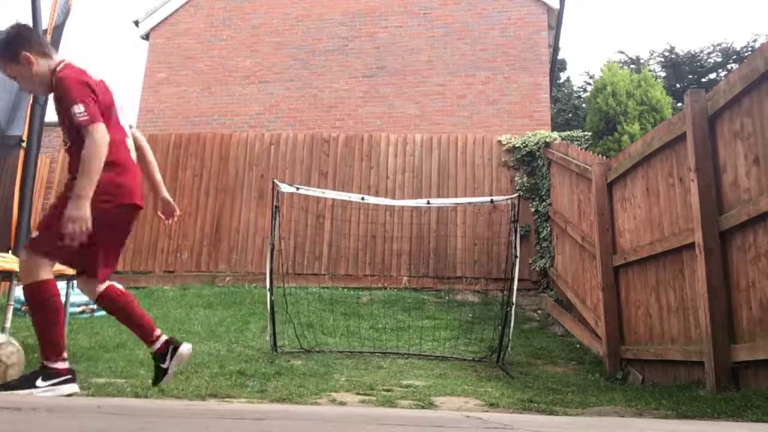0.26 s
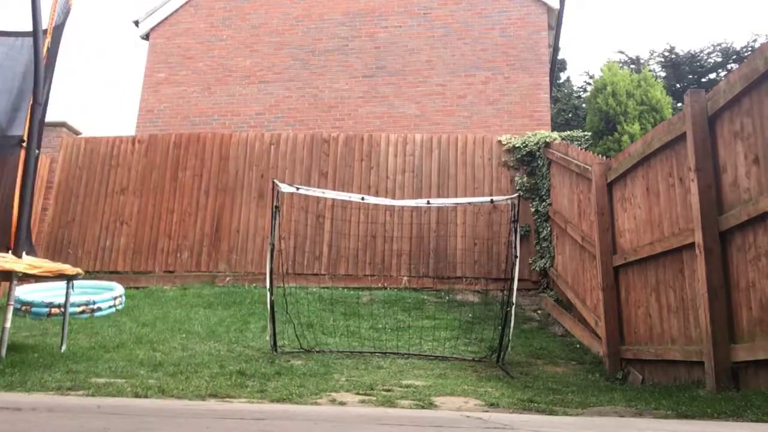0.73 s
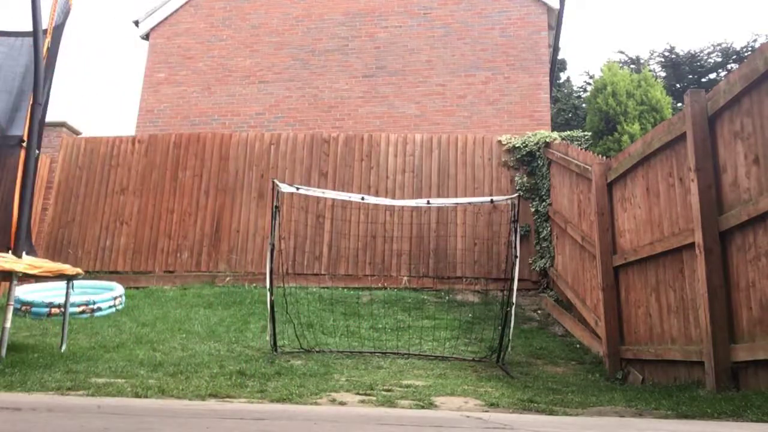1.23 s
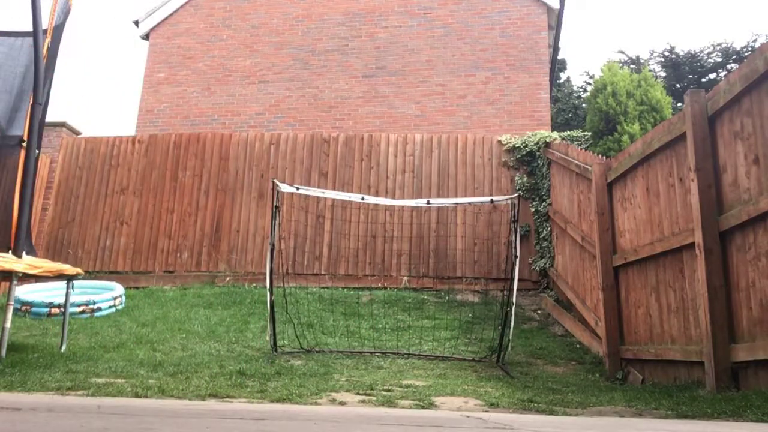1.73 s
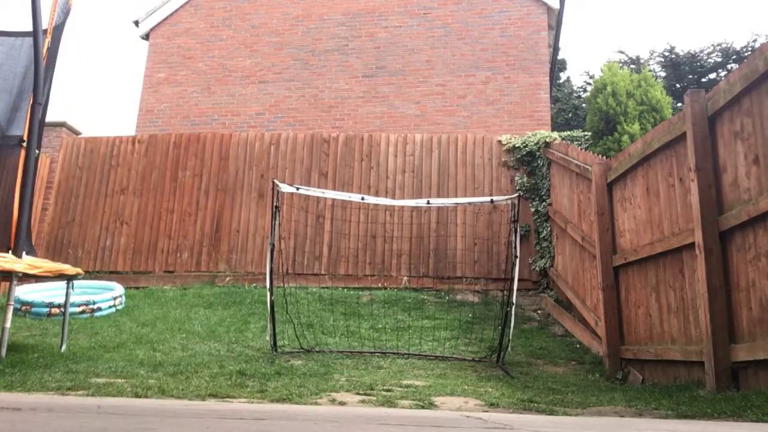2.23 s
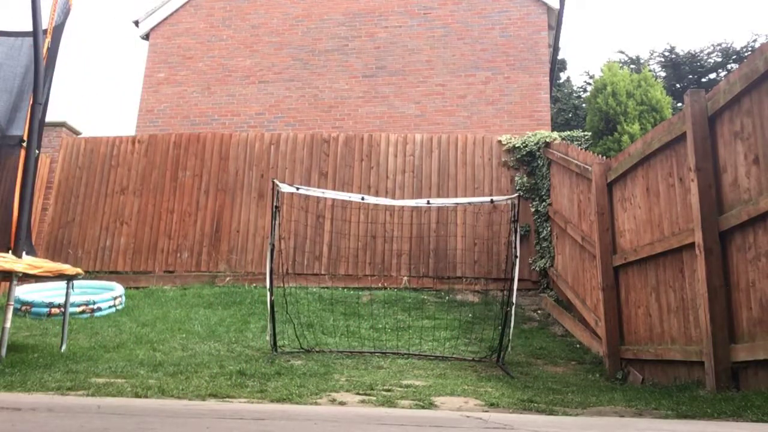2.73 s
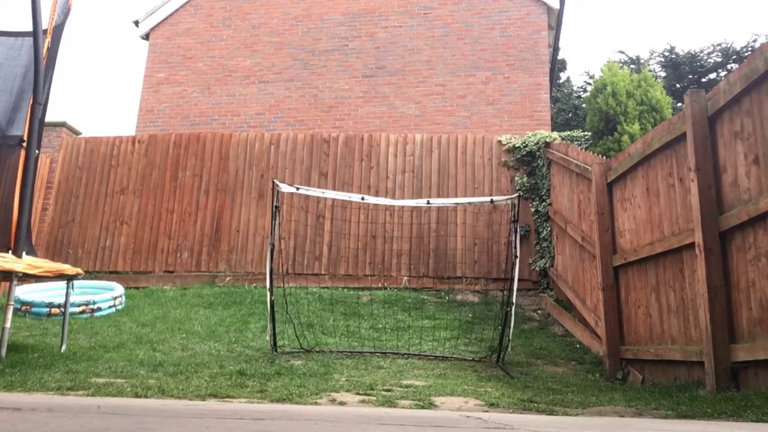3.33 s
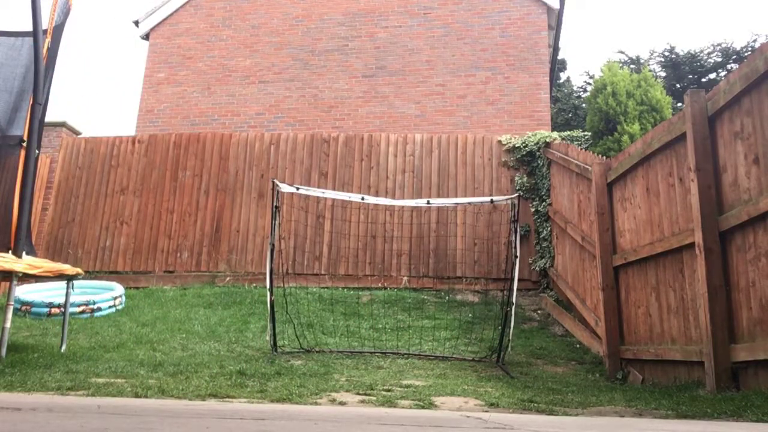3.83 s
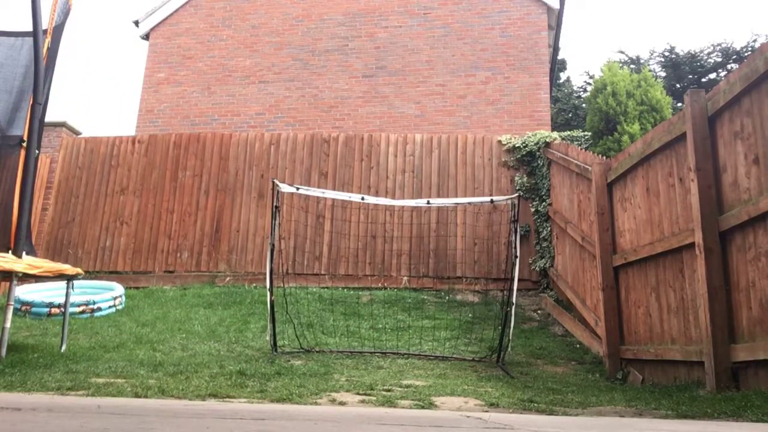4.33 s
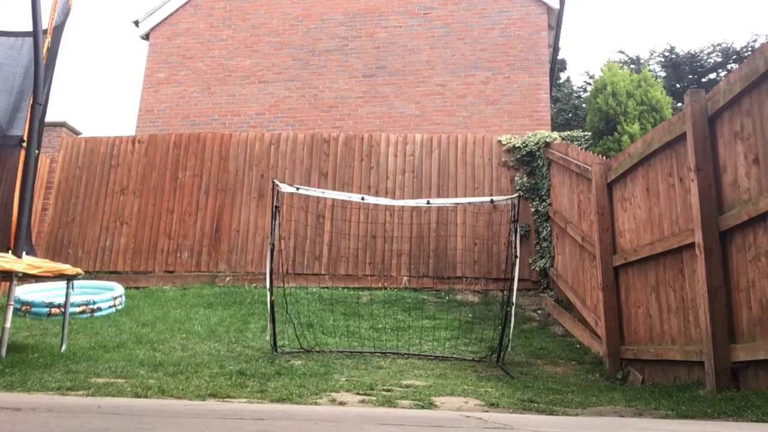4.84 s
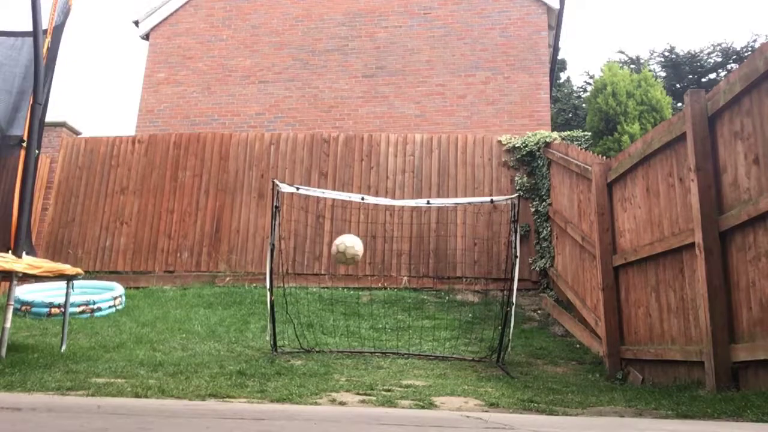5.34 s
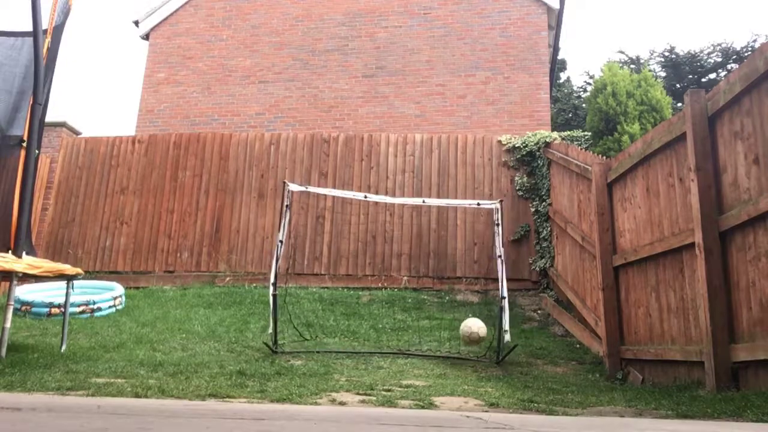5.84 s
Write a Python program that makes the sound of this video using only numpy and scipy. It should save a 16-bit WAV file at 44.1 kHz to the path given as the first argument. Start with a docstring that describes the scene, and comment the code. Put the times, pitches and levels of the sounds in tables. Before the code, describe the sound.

Dull football touches, a booming knock on a garden fence, quiet steps through grass, then one sharp kick and a soft net smack.

```python
"""Football in a small fenced garden

A child taps a ball on the lawn; it bangs against a wooden fence and bounces. Shoes thud and swish
through the grass. A hard shot smacks into the net of a light goal and the ball drops.
The fences echo the play. Far traffic hums and small birds chirp."""
import sys
import numpy as np
from scipy import signal
from scipy.fft import rfft, irfft
from scipy.io import wavfile
from scipy.ndimage import uniform_filter1d

SR = 44100
rng = np.random.default_rng(int(sys.argv[2]) if len(sys.argv) > 2 else 0)


def materialize(psi):
    """Save the field psi as 16-bit PCM at rate SR to the path in sys.argv[1].

    A 1-D psi becomes a single channel; in a 2-D psi each row is a channel.
    """
    bounded = np.clip(np.atleast_2d(psi).T, -1, 1)
    quanta = np.round(bounded * 32767).astype(np.int16)
    wavfile.write(sys.argv[1], SR, quanta)


N = 267772
T = np.arange(int(.8 * SR)) / SR   # time axis of one event, s

# Spectrum of a board knock or sole pat. Each row: frequency in Hz, level in dB.
CLATTER_SPECTRUM = [(150, 3), (400, 13), (1200, 3), (1800, -13.5), (3000, -16), (5000, -25), (9000, -30.5),
                    (15000, -69)]


def from_db(db):
    """Decibels to gain."""
    return 10 ** (np.asarray(db) / 20)


def unit_rms(x):
    """Scale to unit power."""
    return x / np.sqrt(np.mean(x ** 2) + 1e-20)


def add(out, start_s, sound):
    """Mix a sound in at start_s."""
    i = max(0, int(start_s * SR))
    out[i:i + len(sound)] += sound[:max(0, N - i)]


def band_noise(low_hz, high_hz, size=len(T)):
    """Band-passed white noise."""
    sos = signal.butter(2, [low_hz, min(high_hz, .45 * SR)], "band", fs=SR, output="sos")
    return signal.sosfilt(sos, rng.standard_normal(size))


def shaped_noise(spectrum, size=len(T), tilt_db_oct=0):
    """Unit-power noise with a tilted spectrum of (Hz, dB) rows."""
    octaves = np.log2(np.fft.rfftfreq(size, 1 / SR) + 1)
    hz, db = np.transpose(spectrum)
    gain = from_db(np.interp(octaves, np.log2(hz), db) + tilt_db_oct * octaves)
    return unit_rms(irfft(rfft(rng.standard_normal(size)) * gain, size))


def ring(modes):
    """Struck modes; their strengths vary slightly per blow."""
    return sum((-1) ** k * from_db(db + rng.normal() - 60 * T / t60_s) * np.sin(2 * np.pi * hz * T)
               for k, (hz, db, t60_s) in enumerate(modes))


def thump(hz, swell_s):
    """A few cycles that swell under compression and die on release."""
    u = T / swell_s
    return (u * np.exp(1 - u)) ** 2 * np.sin(2 * np.pi * hz * T)


def slap(hz, cycles):
    """Pressure swing of air squeezed from a contact; soft surfaces round its edge."""
    soften = signal.butter(2, min(3 * hz, .4 * SR), fs=SR, output="sos")
    return -signal.sosfilt(soften, thump(hz, cycles / hz))


def stroke(length_s):
    """Rise and fall times of a rub; quick ones start abruptly."""
    slow_s = 0.048
    rise_share = max(0.35 * min(length_s / slow_s, 1), .01)
    return rise_share * length_s, (1 - rise_share) * length_s


def swell(rise_s, fall_s):
    """Linear rise, exponential fall."""
    return np.minimum(T / rise_s, 1) * np.exp(-np.maximum(T - rise_s, 0) / fall_s)


def rustle(spectrum, rise_s, fall_s, grain_db, tilt_db_oct=0):
    """Many small contacts: noise in millisecond grains that swells and fades."""
    lumps = uniform_filter1d(uniform_filter1d(rng.standard_normal(len(T)), size=50), size=12)
    grains = unit_rms(from_db(grain_db * unit_rms(lumps)))
    return shaped_noise(spectrum, tilt_db_oct=tilt_db_oct) * grains * swell(rise_s, fall_s)


def traffic(level_db):
    """Steady hum of far traffic."""
    # Each row: frequency in Hz, relative density in dB.
    hum_spectrum = [(13, 5), (22, -26), (49, 3), (80, -4.5), (199, -6), (536, -15.5), (904, -11.5),
                    (1440, -22.5), (1660, -27), (2120, -35), (2570, -35), (4580, -41.5), (5560, -42.5),
                    (12300, -47), (15800, -60)]
    return from_db(level_db) * shaped_noise(hum_spectrum, N)


def bird_note(level_db, end_s):
    """A far bird holds a thin high note."""
    fade = np.clip((end_s - np.arange(N) / SR) / .1, 0, 1)
    return from_db(level_db) * unit_rms(band_noise(5200, 5660, N)) * fade


def bird_chips(start_s, end_s, level_db, tones_hz, count):
    """Another far bird repeats two-toned chips at a loose pace."""
    out = np.zeros(N)
    envelope = np.sin(np.pi * np.minimum(T / .05, 1)) ** 2
    for s, (late, stray_db) in zip(np.linspace(start_s, end_s, count), rng.standard_normal((count, 2))):
        low, high = (unit_rms(band_noise(hz / 1.04, hz * 1.04)) for hz in tones_hz)
        add(out, s + .012 * late, from_db(level_db + stray_db) * (low + from_db(-2) * high) * envelope)
    return out


def garden(play, build_s):
    """Direct sound, dull echoes off fences and walls, then diffuse scatter."""
    # Each row: delay in seconds, level in dB.
    echoes = [(.0018, -39), (0.011, -9.5), (0.0154, -45), (0.0199, -16), (.0225, -36), (0.038, -38)]
    # Each row: frequency in Hz, level in dB, T60 in seconds.
    scatter_bands = [(50, -18, 0.83), (124, -5, 0.54), (263, -1.5, 0.34), (573, -10, 0.37),
                     (1140, -12, 0.39), (2930, -8.5, 0.22), (6700, -19.5, 0.56), (14000, -19, 0.34)]
    # Reflections grow as the play moves away. Each row: time in seconds, send in dB.
    reverb_send = [(0.5, -4.5), (0.92, 0), (1.8, 1.5), (5.14, -3), (5.6, -0.5)]
    response = np.zeros(len(T))
    for delay_s, echo_db in echoes:
        response[int(delay_s * SR)] += from_db(echo_db)
    response = signal.sosfilt(signal.butter(1, [220, 1900], "band", fs=SR, output="sos"), response)
    hz, *columns = np.transpose(scatter_bands)
    for centre_hz in 40 * 2 ** np.arange(0, 9, .5):
        db, t60_s = (np.interp(np.log(centre_hz), np.log(hz), column) for column in columns)
        fade = (1 - np.exp(-(T / build_s) ** 2)) * from_db(-60 * T / t60_s)
        scatter = band_noise(centre_hz / 2 ** .25, centre_hz * 2 ** .25)
        response += from_db(db) * scatter * fade / np.linalg.norm(fade)
    send = from_db(np.interp(np.arange(N) / SR, *np.transpose(reverb_send)))
    return play + signal.fftconvolve(play * send, response)[:N]


def ticks(centre_hz, decay_s):
    """The ball clips something hard."""
    # Each row: start in seconds, level in dB.
    contacts = [(0.5098, -42.5), (1.3588, -42.5), (5.8732, -41.5)]
    out = np.zeros(N)
    for s, db in contacts:
        burst = unit_rms(band_noise(centre_hz / 1.4, centre_hz * 1.4))
        add(out, s, from_db(db) * burst * np.exp(-T / decay_s))
    return out


def footsteps(base_hz, firmness_oct_per_db):
    """Heels thud and soles pat on turf; a firmer step thuds higher."""
    # Each row: start in seconds, heel level in dB, sole level in dB.
    steps = [(0.258, -38.5, -41), (0.632, -48, -34.5), (0.711, -55, -32), (0.863, -62, -32),
             (2.275, -33, -53), (2.455, -33.5, -42), (4.55, -48, -45.5), (4.96, -37.5, -38.5),
             (5.001, -40, -40)]
    out = np.zeros(N)
    for s, heel_db, pat_db in steps:
        heel_hz = base_hz * 2 ** (firmness_oct_per_db * (pat_db - heel_db))
        add(out, s, from_db(heel_db) * thump(heel_hz, swell_s=0.0052))
        add(out, s, from_db(pat_db) * rustle(CLATTER_SPECTRUM, rise_s=0.0036, fall_s=0.014, grain_db=0.5))
    return out


def grass():
    """Shoes and ball brush the blades; slow strokes also drag the sole and crunch."""
    # Each row: start in seconds, length in seconds, level in dB, tilt in dB per octave.
    swishes = [(0.255, 0.036, -51.5, -2), (0.696, .035, -37, -0.5), (0.851, 0.032, -37.5, -1.5),
               (1.3023, 0.012, -32, -1), (1.40, 0.25, -64.5, 0.5), (1.981, 0.065, -44.5, -2.5),
               (2.019, 0.024, -46, -1), (2.121, 0.04, -45.5, -1.5), (2.175, 0.013, -52, 2.5),
               (2.791, 0.11, -50, -4), (3.253, 0.049, -57.5, -2), (3.54, .05, -47, -3),
               (4.017, .018, -50.5, 1), (4.1275, 0.015, -40.5, 0.5), (4.829, .088, -48.5, -4.5),
               (5.1213, 0.0099, -30, -3.5), (5.141, 0.0084, -32, -2), (5.307, 0.038, -46.5, -3),
               (5.395, 0.075, -53, -2.5), (5.459, 0.0076, -42, -3)]
    # Each row of both: frequency in Hz, level in dB.
    blade_spectrum = [(150, -5), (500, 16), (1200, 17), (1800, -1), (3000, 5), (4200, 6), (5200, 3),
                      (7500, 3.5), (9500, 5), (12000, -4.5), (16000, -17)]
    sole_spectrum = [(300, -14.5), (1500, -1), (2400, -3), (3100, -1.5), (4300, -5), (5500, -6),
                     (9000, -13), (16000, -50)]
    out = np.zeros(N)
    for s, length_s, db, tilt in swishes:
        rise_s, fall_s = stroke(length_s)
        blades = rustle(blade_spectrum, rise_s, fall_s, grain_db=1, tilt_db_oct=tilt)
        sole = rustle(sole_spectrum, rise_s, fall_s, grain_db=2, tilt_db_oct=tilt)
        drag = from_db(-1.5) * min(rise_s / 0.023, 1)
        add(out, s, from_db(db) * (blades + drag * sole))
    return out


def goal(squeak_start_s, squeak_hz):
    """The net snaps taut and drags over the frame; a thin high squeak follows, probably a far bird."""
    # Each row: start in seconds, length in seconds, level in dB.
    net_pulls = [(5.519, 0.014, -31.5), (5.526, 0.057, -40), (5.577, 0.17, -43), (5.685, 0.058, -41.5),
                 (5.787, 0.016, -40), (5.962, 0.057, -48)]
    # Each row: frequency in Hz, level in dB.
    net_spectrum = [(200, -2), (400, 1), (580, 8), (950, 5), (1500, -7), (2600, -11.5), (4200, -15.5),
                    (5500, -23.5), (9000, -29.5), (15000, -60)]
    out = np.zeros(N)
    smack = from_db(-30) * slap(hz=725, cycles=2.3) + from_db(-29.5) * slap(hz=3350, cycles=0.82)
    add(out, net_pulls[0][0], smack)
    for s, length_s, db in net_pulls:
        add(out, s, from_db(db) * rustle(net_spectrum, *stroke(length_s), grain_db=-0.5))
    waver = unit_rms(band_noise(16, 152))
    squeak = np.sin(2 * np.pi * np.cumsum(squeak_hz + 70 * waver) / SR) * from_db(4.5 * waver)
    add(out, squeak_start_s, from_db(-62) * squeak * swell(*stroke(length_s=0.088)))
    return out


def fence(heave_cycles):
    """The struck panel booms, its boards ring and clatter, a metal fitting jingles."""
    # The ball's blow, then loose boards knocking back. Each row: start in seconds, level in dB.
    knocks = [(0.9152, -18.5), (0.932, -26), (0.9592, -22.5), (0.994, -32), (1.025, -34)]
    # The panel moves on its posts. Each row: start in seconds, frequency in Hz, level in dB.
    heaves = [(0.912, 64.6, -11), (0.932, 98, -5.5), (0.981, 49.7, -18.5)]
    # Each row of both: frequency in Hz, level in dB, T60 in seconds.
    board_modes = [(80, -40, 0.4), (112.8, -36, 0.77), (192.7, -20.5, 0.23), (263.7, -25, 0.35),
                   (320.3, -15.5, 0.1), (428, -20, 0.13), (501.6, -30, 0.37), (585, -48, 0.21),
                   (730, -44, 0.14), (792, -46, 0.13), (1236, -21.5, 0.045), (1180, -56, 0.23),
                   (1360, -58, 0.27)]
    fitting_modes = [(6250, -5, 0.06), (8400, -7, 0.054), (8700, -10.5, 0.12), (11700, -14, 0.044)]
    out, struck_s = np.zeros(N), knocks[0][0]
    add(out, struck_s, from_db(-5.5) * slap(hz=704, cycles=0.27) + ring(board_modes))
    for s, hz, db in heaves:
        add(out, s, from_db(db) * thump(hz, swell_s=heave_cycles / hz))
    add(out, struck_s + 0.078, from_db(-27) * thump(hz=120, swell_s=0.026))   # settling boom
    for s, db in knocks:
        add(out, s, from_db(db) * rustle(CLATTER_SPECTRUM, rise_s=0.0011, fall_s=0.017, grain_db=4))
    for k, (s, _) in enumerate(knocks[1:]):
        chink = unit_rms(band_noise(8500, 9400)) * np.exp(-T / 0.0033)
        jingle = chink + from_db(-2) * ring(fitting_modes)
        add(out, s, from_db(-37.5 - 8.5 * k) * jingle)   # weaker on each knock
    return out


def ball(squeeze_cycles, squash_s, crack_s):
    """Foot or turf hits the ball: it thumps and slaps, shell and air ring, the skin cracks."""
    # Each row: start in seconds, slap in dB, slap in Hz, thump in dB, thump in Hz, crack in dB.
    hits = [(0.5063, -15, 870, -13, 87, -25), (0.6427, -13.5, 617, -30, 68.5, -45.5),
            (1.301, -22, 800, -25.5, 69.4, -44), (1.3591, -23, 476, -25.5, 62, -45.5),
            (1.7639, -21, 380, -23.5, 111, -39.5), (1.7949, -22.5, 218, -22, 64.3, -70),
            (1.836, -23, 644, -28.5, 91, -41), (5.1373, -2.5, 560, -7, 66.3, -18),
            (5.8622, -37, 710, -18.5, 67, -46), (5.8721, -18, 610, -26.5, 90.6, -47.5)]
    # Enclosed air and shell. Each row of both: frequency in Hz, level in dB, T60 in seconds.
    air_modes = [(990, 1, .025), (1170, -8, .055), (1480, -19, .035), (1850, -24, .045), (2230, -20, .045),
                 (2560, -22, .035)]
    shell_modes = [(123.6, 9.5, 0.061), (175, -15.5, 0.2), (225, 0.5, 0.12), (325.4, -3, 0.094),
                   (404.6, -17, 0.54), (489, -8.5, 0.085), (591.5, -4.5, 0.29), (657, -22, 0.51)]
    # Flattening shell and struck skin. Each row of both: frequency in Hz, level in dB.
    squash_spectrum = [(60, 3), (170, 3), (230, -9), (350, 0), (580, 0.5), (720, 3.5), (900, -25),
                       (1200, -57), (1600, -67), (5000, -44), (15000, -70)]
    skin_spectrum = [(200, -18), (1500, -10), (2400, -5), (3200, -1), (4400, 0), (5200, -11), (6600, -9),
                     (8500, -22), (14000, -38), (22000, -60)]
    out = np.zeros(N)
    crack_decay = np.exp(-T / crack_s) + from_db(-26) * np.exp(-T / .011)
    crack_envelope = (1 - np.exp(-(T / .0005) ** 2)) * crack_decay
    for s, slap_db, slap_hz, thump_db, thump_hz, crack_db in hits:
        add(out, s, from_db(thump_db) * thump(thump_hz, swell_s=squeeze_cycles / thump_hz))
        add(out, s + 0.00139, from_db(slap_db) * slap(slap_hz, cycles=0.4))   # yields just after contact
        squash = from_db(1.5) * rustle(squash_spectrum, rise_s=0.0025, fall_s=squash_s, grain_db=2.5)
        shell = from_db(4.5) * slap(hz=176.3, cycles=0.57) + from_db(-2) * ring(shell_modes)
        air = from_db(crack_db - 7 - 0.65 * slap_db) * ring(air_modes)   # flattening stifles the ring
        add(out, s + 0.000983, from_db(slap_db - 14.5) * (squash + shell) + air)
        pitch_ratio = 2 ** (slap_db / 33.5)   # softer blows crack lower
        skin = shaped_noise([(hz * pitch_ratio, db) for hz, db in skin_spectrum]) * crack_envelope
        snap = from_db(-3.5) * slap(hz=3800 * pitch_ratio, cycles=0.96)
        add(out, s, from_db(crack_db) * (skin + snap))
    return out


def scene():
    """The game in the garden over birds and far traffic, mono."""
    play = ball(squeeze_cycles=0.86, squash_s=0.021, crack_s=0.0016)
    play += fence(heave_cycles=0.88)
    play += ticks(centre_hz=7300, decay_s=0.0007)
    play += footsteps(base_hz=132, firmness_oct_per_db=0.035) + grass()
    play += goal(squeak_start_s=5.79, squeak_hz=5640)
    birds = bird_chips(start_s=2.48, end_s=4.6, level_db=-76.5, tones_hz=(4000, 5520), count=24)
    birds += bird_note(level_db=-75.5, end_s=0.64)
    return (garden(play, build_s=0.0057) + birds + traffic(level_db=-46.5))[None]


def record(dry):
    """The microphone drops the deepest bass; the top is cut."""
    low_hz, high_hz = 27, 15600
    thin = signal.sosfilt(signal.butter(4, low_hz, "high", fs=SR, output="sos"), dry)
    return signal.sosfilt(signal.ellip(10, .1, 90, high_hz, fs=SR, output="sos"), thin)


dry = scene()
out = record(dry)
materialize(out)
```